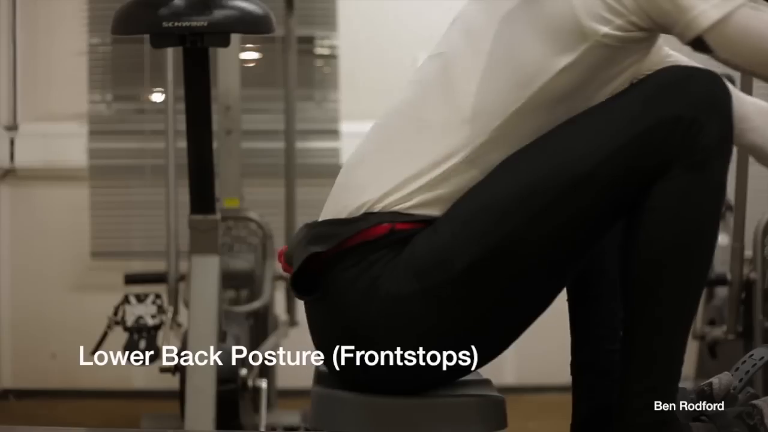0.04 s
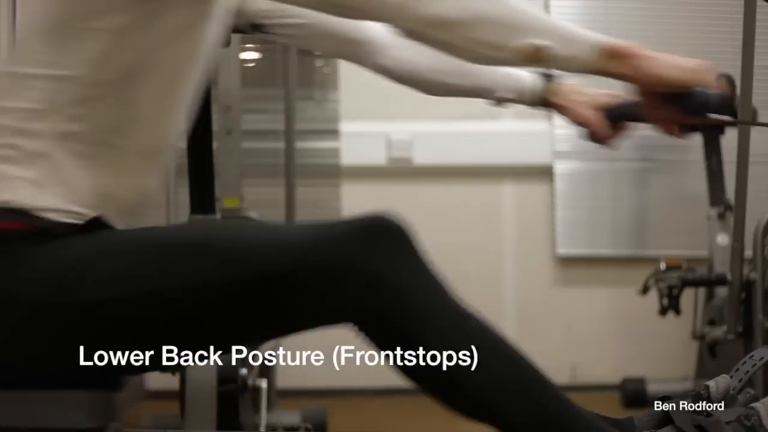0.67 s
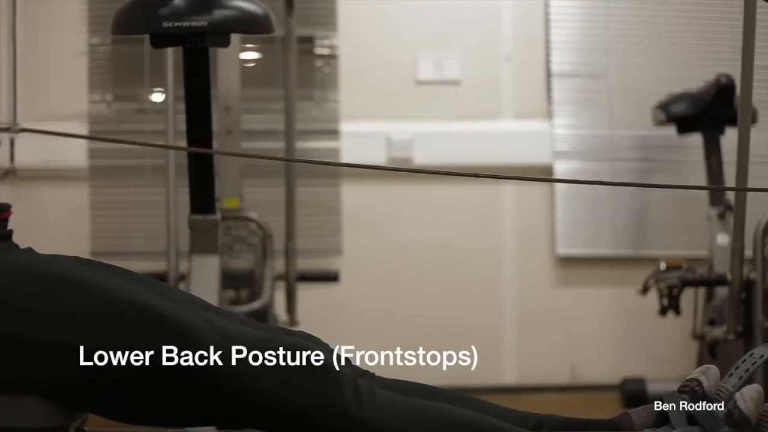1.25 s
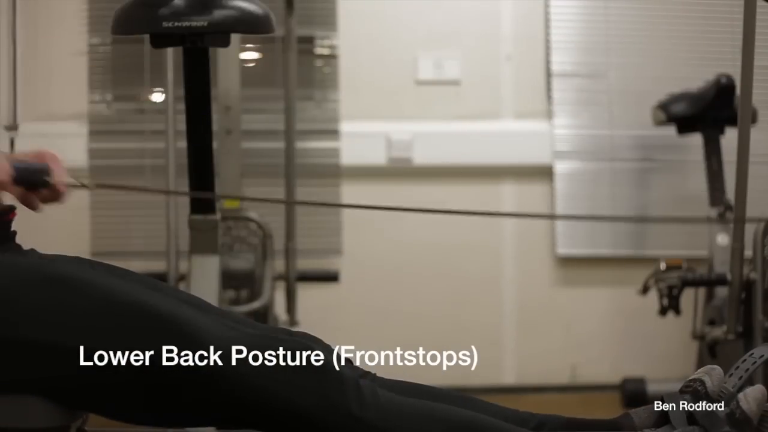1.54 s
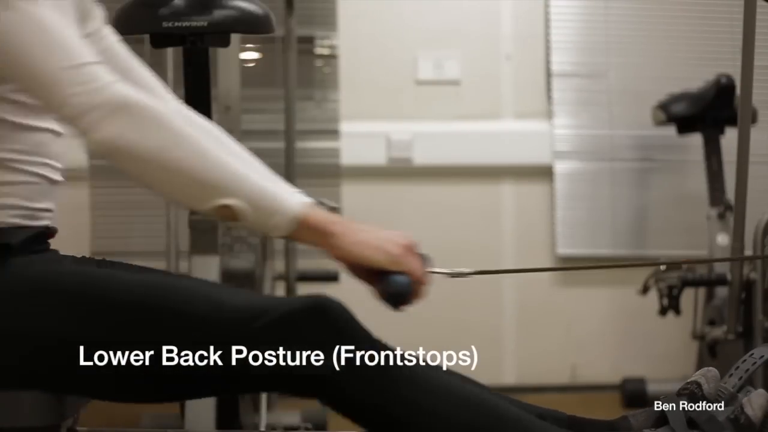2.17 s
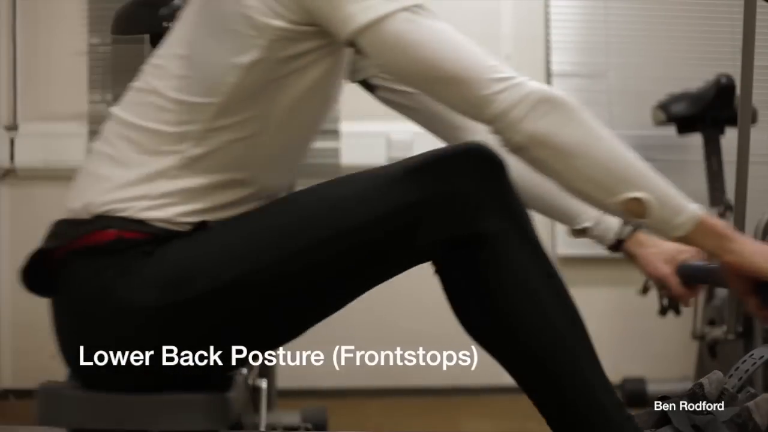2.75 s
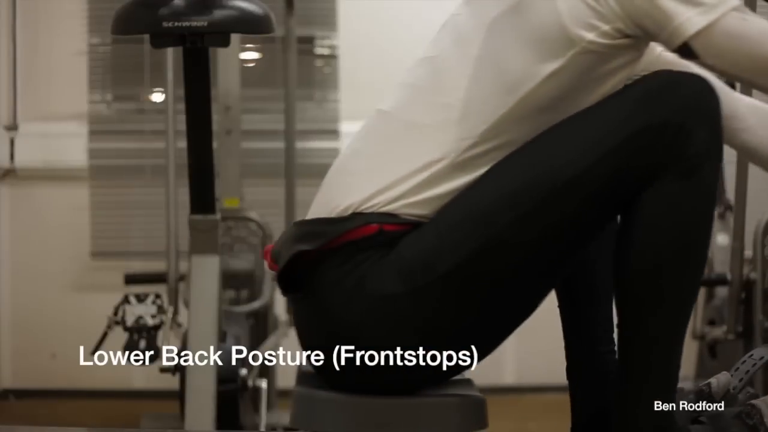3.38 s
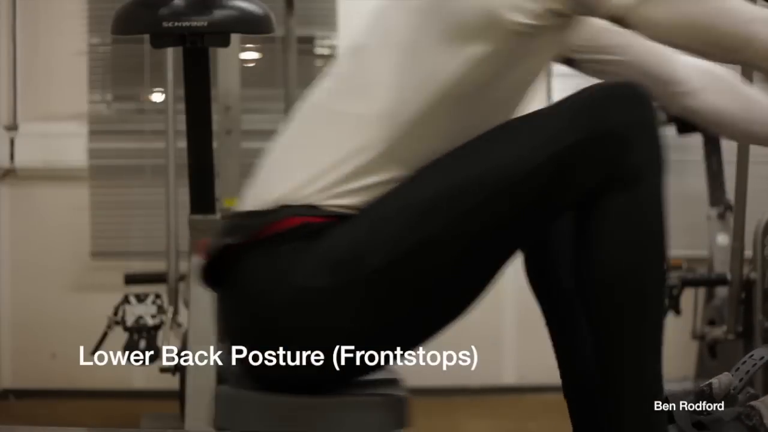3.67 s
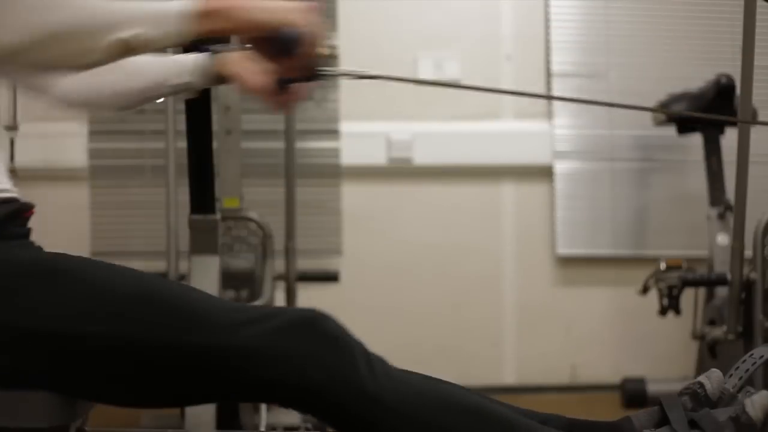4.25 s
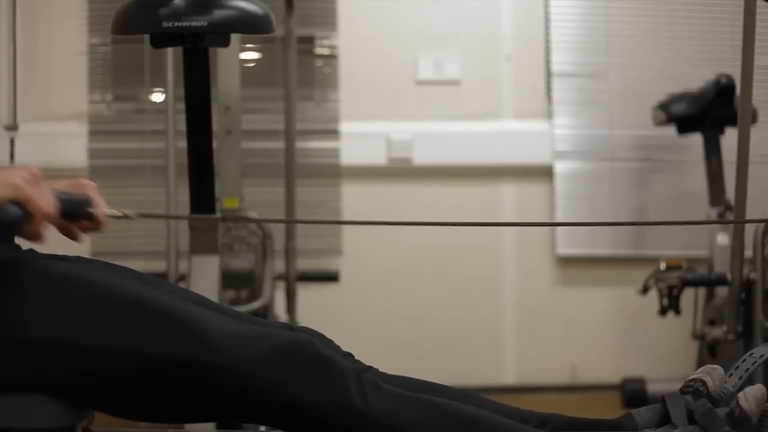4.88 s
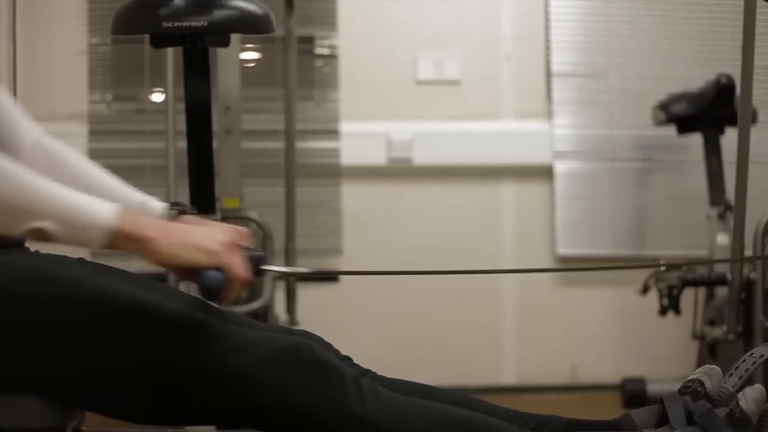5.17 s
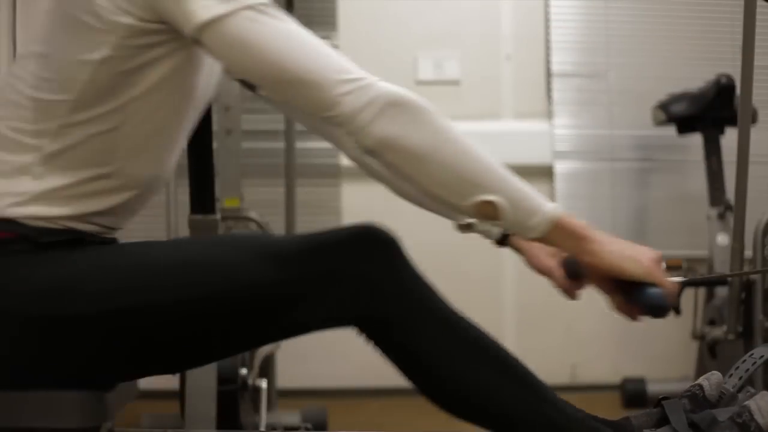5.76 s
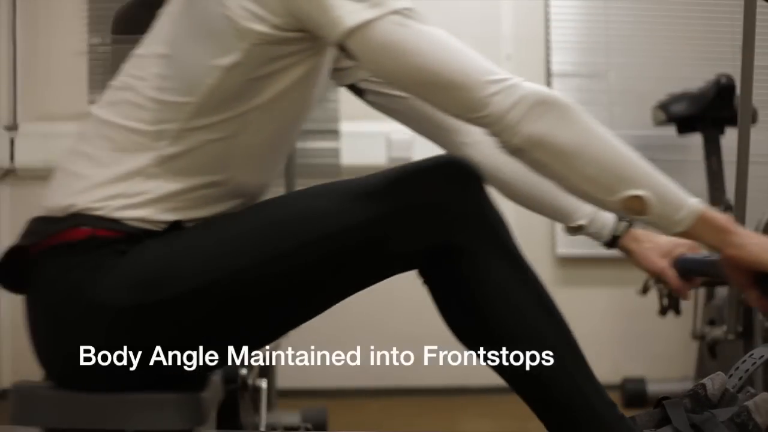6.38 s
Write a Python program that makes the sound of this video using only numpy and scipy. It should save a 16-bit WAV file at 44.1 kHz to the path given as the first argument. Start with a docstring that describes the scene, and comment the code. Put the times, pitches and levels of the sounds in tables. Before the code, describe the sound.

In a small gym, a rowing machine's fan turns with a soft whoosh. A few knocks start the first pull, then the chain clatters and whirrs as the fan swells to a hissing roar and slowly sinks. The seat rollers hum low and the chain runs back in spurts. A second pull follows with lighter knocks and another surge, then coasts down. The sound is mono, with little echo.

```python
"""Over the soft whoosh of a turning fan, a few knocks and a rattling chain open a rowing stroke.
It is the first of two on an air-braked rowing machine in a small gym, heard in mono.
The drive knocks as it takes up the load, then the chain clatters and whirrs over its sprocket and
spins up the fan flywheel, whose roar and hiss swell and sink again as it coasts.
Underneath, the seat rollers hum along the rail, and between pulls the chain runs back in spurts."""
import sys
import numpy as np
from scipy import signal
from scipy.io import wavfile

SR = 44100
rng = np.random.default_rng(int(sys.argv[2]) if len(sys.argv) > 2 else 0)


def wav_record(signal):
    """Record a signal, one row per channel, as 16-bit PCM in the file named by sys.argv[1]."""
    frames = np.transpose(np.atleast_2d(signal))
    bounded = np.clip(frames, -1, 1)
    # unit amplitude maps onto the largest positive 16-bit level
    quanta = np.round(bounded * 32767).astype(np.int16)
    wavfile.write(sys.argv[1], SR, quanta)


N = 287973

# rolls of the seat along the rail: start_s, end_s, pitch_hz, level_db
SEAT_ROLLS = [(0.05, 1.204, 129.2, -38), (1.673, 2.14, 123.6, -33.5), (2.21, 2.665, 130.8, -34.5),
              (2.5, 3.28, 120.6, -31.5), (3.76, 4.45, 130, -36.5), (4.95, 5.58, 123, -35),
              (5.55, 6.098, 125.3, -40)]
# links snapping tight: start_s, level_db
LINK_TICKS = [(0.577, -35), (0.592, -37)]
# knocks as the drive takes up the load: start_s, frame_thud_db, guard_clack_db, steel_rattle_db
DRIVE_KNOCKS = [(0.117, -27, -41, -28), (0.240, -18, -18, -30), (0.378, -8, -15, -27),
                (0.579, -30, -30, -21), (0.725, -30, -22, -18), (0.94, -30, -29, -20),
                (3.725, -32, -26, -30), (3.86, -19, -30, -30), (4.05, -22, -22, -18), (4.22, -28, -28, -20)]
# low modes of the knocked frame: pitch_hz, gain_db, t60_s
FRAME_THUD_MODES = [(116, -12.5, 0.3), (152.8, -0.5, 0.095), (171, 0, 0.17), (350, -9.5, 0.12)]
# broad resonances of the frame under the running chain: centre_hz, width_hz, gain_db
FRAME_RUMBLE_MODES = [(172, 72, -3), (268, 80, 0.5), (519, 380, -6.5)]
# resonances of the chain guard: centre_hz, width_hz, gain_db
GUARD_MODES = [(866, 90, 0), (1024, 130, -4.5), (1184, 150, -3), (1342, 92, 0), (1405, 80, -2.5)]
# resonances of sprocket and links: centre_hz, width_hz, gain_db
STEEL_MODES = [(1640, 89, -1.5), (1925, 120, -1.5), (2218, 21, 2), (2420, 140, -2.5), (2720, 180, -3),
               (2973, 180, -2.5), (3264, 150, -3), (3410, 160, -8), (3760, 300, -7)]
# spurts of the chain running back: start_s, end_s, clatter_db, ringing_db, whirr_db
CHAIN_RETURNS = [(2.15, 2.55, -42, -35, -29.5), (2.7, 3.41, -31, -41, -38), (4.83, 5.33, -27.5, -31.5, -29),
                 (5.622, 6.1, -38, -38, -32.5)]
# the rower's pulls: catch_s, build_s, legs_straight_s, arms_home_s, top_speed_ratio, teeth_hz, force_db
# (the catch starts a pull, teeth_hz is the tooth rate there; speed ratio 1 is the wheel's cruising speed)
ROWER_PULLS = [(0.29, .12, 1.04, 1.25, 1.165, 163, -0.9), (3.675, .3, 4.32, 4.53, 1.265, 195, .5)]
# resonances of the fan housing: centre_hz, width_hz, gain_db
HOUSING_MODES = [(397, 54, -8), (449.5, 30, -10), (502, 28, -9.5), (690.5, 67, -4), (1390, 120, -16),
                 (3370, 350, -9)]
# tone colour of the air through the cage at cruising speed: frequency_hz, relative_density_db
AIR_SPECTRUM = [(30, -24), (45, -18.5), (85, -12), (125, -7.5), (240, 0.5), (430, -1.5), (750, -3),
                (1400, -5), (2000, -9.5), (3350, -10.5), (4600, -17), (6200, -20.5), (9500, -19.5),
                (15500, -27)]
# how the air noise swells with wheel speed: frequency_hz, gain_db_per_doubling
AIR_GROWTH = [(50, 8), (130, 4), (300, 9.5), (700, 12), (1500, 11.5), (3300, 12), (6000, 5), (14000, 9)]

GYM_T60_S = 0.23
GLIDE_S = 0.11  # fade in and out of a seat roll or a chain spurt
SLIP_S = .035  # the wheel starts to gain this long after the catch
IDLE_SPEED, DRAG_PER_S = .535, .197  # speed ratio before the first pull; share lost at cruising speed
DRIVEN_TEETH_HZ, COAST_TEETH_HZ = 247, 232  # tooth rates at cruising speed: end of a pull, coasting
CLATTER_DB, RINGING_DB, WHIRR_DB = -18.5, -22.5, -24.5  # the chain at full force and cruising speed
CLATTER_GROWTH_DB, RINGING_GROWTH_DB, WHIRR_GROWTH_DB = -2, 4, 2.5  # per doubling of speed
AIR_DB, HISS_EDGE_HZ = -19.5, 13400  # the fan at cruising speed


def from_db(db):
    """Decibels to gain."""
    return 10 ** (np.asarray(db) / 20)


def unit_rms(x):
    """Scale to an rms of 1."""
    return x / np.sqrt(np.mean(x ** 2) + 1e-20)


def at_hz(curve, hz):
    """Read a curve on a log-frequency axis."""
    points_hz, values = np.array(curve).T
    return np.interp(np.log(hz), np.log(points_hz), values)


def ramp(start_s, length_s):
    """A straight rise from 0 to 1."""
    return np.clip((np.arange(N) / SR - start_s) / length_s, 0, 1)


def swell(start_s, end_s):
    """Rise, hold and fall of one gliding movement."""
    return ramp(start_s, GLIDE_S) * (1 - ramp(end_s - GLIDE_S, GLIDE_S))


def drift(rate_hz):
    """A smooth random modulator with a spread of 1."""
    hop, warm_up = 40, 2000
    r = np.exp(-2 * np.pi * hop * rate_hz / SR)
    noise = rng.standard_normal(N // hop + warm_up + 2)
    slow = signal.lfilter([1], [1, -2 * r, r * r], noise)[warm_up:]
    return np.interp(np.arange(N) / hop, np.arange(len(slow)), unit_rms(slow))


def band(x, low_hz, high_hz, order=2):
    """Butterworth band-pass."""
    return signal.sosfilt(signal.butter(order, [low_hz, high_hz], "band", fs=SR, output="sos"), x)


def resonate(x, modes, sign=-1):
    """Parallel resonators, by default of alternating polarity."""
    out = np.zeros(N)
    for k, (hz, width_hz, db) in enumerate(modes):
        r = np.exp(-np.pi * width_hz / SR)
        poles = [1, -2 * r * np.cos(2 * np.pi * hz / SR), r * r]
        out += sign ** k * from_db(db) * (1 - r * r) / 2 * signal.lfilter([1, 0, -1], poles, x + 1e-18)
    return out


def ring(clicks, hz, t60_s):
    """Each click sets off a decaying sine of its own height."""
    r, w = np.exp(-np.log(1000) / (t60_s * SR)), 2 * np.pi * hz / SR
    return signal.lfilter([0, np.sin(w)], [1, -2 * r * np.cos(w), r * r], clicks + 1e-18)


def rough_tone(hz, wander, rough_db):
    """A rolling contact: a tone whose pitch and level waver."""
    phase = 2 * np.pi * np.cumsum(hz * (1 + wander * drift(24.5))) / SR
    return unit_rms(np.sin(phase) * from_db(rough_db * drift(20)))


def gym(x, wet_db):
    """Direct sound plus a short, diffuse tail off the walls."""
    t = np.arange(int(GYM_T60_S * SR)) / SR
    tail = rng.standard_normal(len(t)) * np.exp(-np.log(1000) * t / GYM_T60_S) * (t > .004)
    wet = signal.fftconvolve(x, tail / np.linalg.norm(tail))[:N]
    return (x + from_db(wet_db) * wet) / np.sqrt(1 + from_db(wet_db) ** 2)


def seat_hum():
    """The seat rollers draw a low, grainy hum from the rail."""
    return sum(from_db(db) * swell(start_s, end_s) * rough_tone(hz, wander=.024, rough_db=2.1)
               for start_s, end_s, hz, db in SEAT_ROLLS)


def link_ticks(decay_s):
    """Links snap tight with tiny, bright bursts of metal on metal."""
    t = np.arange(N) / SR
    bursts = sum(from_db(db) * (t >= s) * np.exp(-np.abs(t - s) / decay_s) for s, db in LINK_TICKS)
    sizzle = unit_rms(band(rng.standard_normal(N), 4000, 17000))
    return gym(bursts * sizzle, wet_db=-10.0)


def drive_knocks(decay_s):
    """The slack snaps out of the drive: the frame thuds, the guard clacks and the links rattle."""
    thuds, clacks, rattles = np.zeros((3, N))
    t = np.arange(N) / SR
    for start_s, thud_db, clack_db, rattle_db in DRIVE_KNOCKS:
        thuds[round(start_s * SR)] = from_db(thud_db)
        decay = (t >= start_s) * np.exp(-np.abs(t - start_s) / decay_s)
        clacks += from_db(clack_db) * decay
        rattles += from_db(rattle_db) * decay
    frame = sum(from_db(db) * ring(thuds, hz, t60_s) for hz, db, t60_s in FRAME_THUD_MODES)
    frame = band(frame, 85, 900, order=3)  # the slim frame radiates no deep bass
    guard = band(clacks * unit_rms(resonate(rng.standard_normal(N), GUARD_MODES)), 600, 1830)
    steel = band(rattles * unit_rms(resonate(rng.standard_normal(N), STEEL_MODES)), 1700, 9000)
    return gym(frame + guard + steel, wet_db=-10.0)


def pull_force(arms_db=-5, handover_s=.09, let_go_s=0.3):
    """Chain tension bites at the catch, holds while the legs push, eases for the arms, then lets go."""
    force = np.zeros(N)
    for catch_s, build_s, legs_s, home_s, _, _, db in ROWER_PULLS:
        bite = np.sqrt(ramp(catch_s, build_s))
        easing = from_db(arms_db * ramp(legs_s - handover_s, handover_s))
        release = 1 - ramp(home_s, let_go_s)
        force += from_db(db) * bite * easing * release
    return force


def sprocket_rate(speed, settle_s=.55):
    """Teeth per second: climbing evenly through each pull, then falling in with the coasting wheel."""
    teeth_hz = COAST_TEETH_HZ * speed
    for catch_s, build_s, legs_s, _, top_speed, catch_hz, _ in ROWER_PULLS:
        progress = ramp(catch_s + SLIP_S, legs_s - catch_s - SLIP_S)
        hauled_hz = catch_hz + (DRIVEN_TEETH_HZ * top_speed - catch_hz) * progress
        engaged = ramp(catch_s - build_s, build_s) * (1 - ramp(legs_s, settle_s))
        teeth_hz += engaged * (hauled_hz - teeth_hz)
    return teeth_hz


def chain_envelopes(speed, slack_db=-23):
    """Clatter, ringing and whirr ride on force and speed, and stir again as the chain runs back."""
    force = np.hypot(pull_force(), from_db(slack_db))  # the slack chain never quite comes to rest
    doublings = np.log2(speed)
    clatter = force * from_db(CLATTER_DB + CLATTER_GROWTH_DB * doublings)
    ringing = force ** 1.4 * from_db(RINGING_DB + RINGING_GROWTH_DB * doublings)
    whirr = force * from_db(WHIRR_DB + WHIRR_GROWTH_DB * doublings)
    returning = sum(np.outer(from_db(levels_db), swell(start_s, end_s))
                    for start_s, end_s, *levels_db in CHAIN_RETURNS)
    return np.hypot([clatter, ringing, whirr], returning)


def sprocket_whirr(teeth_hz, envelope):
    """The sprocket pulses once per tooth: a gliding tone that wavers and breaks up."""
    return envelope * rough_tone(teeth_hz, wander=.032, rough_db=3.0)


def link_hits(teeth_hz, uneven_db, rattle):
    """Each link lands on a tooth with a force of its own, and its roller rattles until the next one."""
    teeth = np.cumsum(teeth_hz * (1 + .03 * drift(30))) / SR
    link = teeth.astype(int)
    force = from_db(uneven_db * np.clip(rng.standard_normal(N), -2, 2))[link]
    landings = unit_rms(np.diff(link, prepend=0).astype(float))
    chatter = unit_rms(rng.standard_normal(N) * np.exp(-1.5 * (teeth % 1)))
    return force * (landings + rattle * chatter)


def running_chain(teeth_hz, clatter, ringing):
    """Passing links make the guard clatter, the frame rumble and the steel ring."""
    guard = band(resonate(link_hits(teeth_hz, uneven_db=2.0, rattle=1.48), GUARD_MODES), 680, 1750)
    steel = band(resonate(link_hits(teeth_hz, uneven_db=2.5, rattle=1.5), STEEL_MODES), 1400, 5970)
    rumble = band(resonate(rng.standard_normal(N), FRAME_RUMBLE_MODES), 130, 752, order=3)
    body = unit_rms(gym(guard, wet_db=-7.0)) + from_db(-4.0) * unit_rms(rumble)
    return clatter * body + ringing * unit_rms(gym(steel, wet_db=-6.0))


def wheel_speed():
    """The legs spin the wheel up in an S-curve; then drag, growing with the square of speed, slows it."""
    t, speed = np.arange(N) / SR, np.full(N, IDLE_SPEED)
    for catch_s, _, legs_s, _, top_speed, _, _ in ROWER_PULLS:
        spin_up = np.sin(np.pi / 2 * ramp(catch_s + SLIP_S, legs_s - catch_s - SLIP_S)) ** 2
        coasting = top_speed / (1 + DRAG_PER_S * top_speed * np.maximum(t - legs_s, 0))
        speed += spin_up * (coasting - speed)
    return speed


def fan_roar(speed, flutter_db, edge_slope):
    """Vane turbulence, coloured by the housing: a faster wheel is louder, its finer eddies brighter."""
    edges_hz = np.geomspace(28, 17000, 38)
    white, buffet = rng.standard_normal((2, N)), drift(11)
    doublings, air, power = np.log2(speed), np.zeros(N), 0
    for k, (low_hz, high_hz) in enumerate(zip(edges_hz, edges_hz[1:])):
        hz = np.sqrt(low_hz * high_hz)
        gain = from_db(at_hz(AIR_SPECTRUM, hz)) * np.sqrt(high_hz - low_hz)
        # above the hiss edge only a faint haze of fine eddies remains
        rolloff = np.sqrt(1 / (1 + (hz / (HISS_EDGE_HZ * speed)) ** edge_slope) + from_db(-17) ** 2)
        # big eddies buffet the roar; the hiss stays smooth
        wobble_db = flutter_db * (buffet + drift(7.7)) / (1 + hz / 3000)
        envelope = from_db(at_hz(AIR_GROWTH, hz) * doublings + wobble_db)
        noise = unit_rms(band(white[k % 2], low_hz, high_hz, order=3))
        air += gain * rolloff * envelope * noise
        power += gain ** 2
    air = from_db(AIR_DB) * air / np.sqrt(power)
    return air + resonate(air, HOUSING_MODES, sign=1)


def scene():
    """Fan and chain follow the wheel, over seat hum, knocks and ticks; both channels are the same."""
    speed = wheel_speed()
    teeth_hz = sprocket_rate(speed)
    clatter, ringing, whirr = chain_envelopes(speed)
    fan = fan_roar(speed, flutter_db=.5, edge_slope=7.1)
    chain = running_chain(teeth_hz, clatter, ringing) + sprocket_whirr(teeth_hz, whirr)
    machine = fan + chain + seat_hum() + drive_knocks(decay_s=0.045) + link_ticks(decay_s=.008)
    return np.stack([machine, machine])


def record(dry):
    """The sound cuts in and out abruptly, and a steep low-pass trims the very top."""
    on_s, off_s, cutoff_hz = 0.084, 5.965, 15800
    t = np.arange(N) / SR
    gate = (t >= on_s) & (t < off_s)
    return signal.sosfilt(signal.ellip(12, .1, 90, cutoff_hz, fs=SR, output="sos"), dry * gate)


dry = scene()
out = record(dry)
wav_record(out)
```